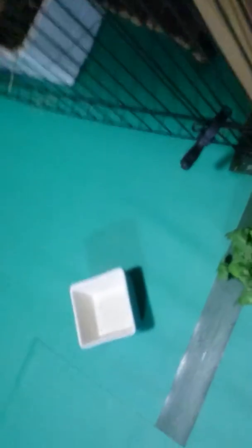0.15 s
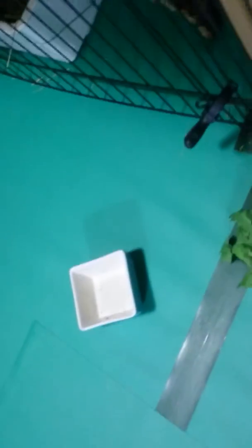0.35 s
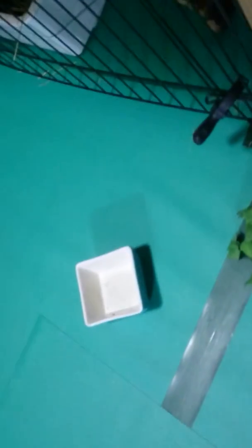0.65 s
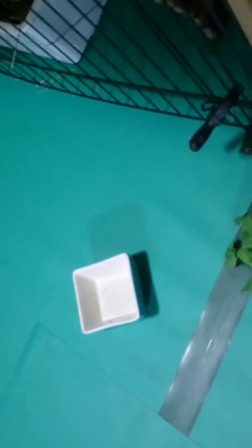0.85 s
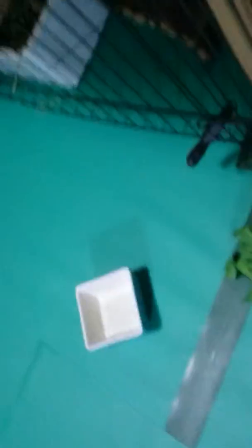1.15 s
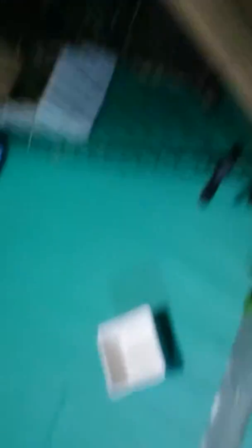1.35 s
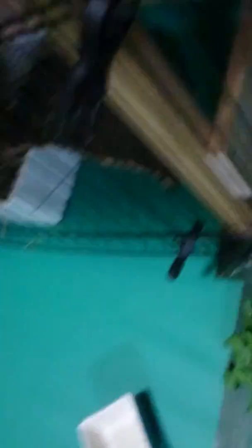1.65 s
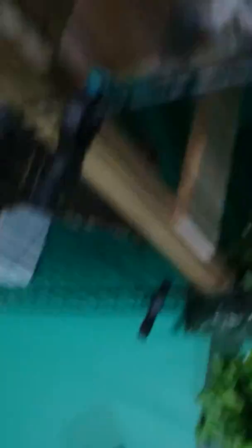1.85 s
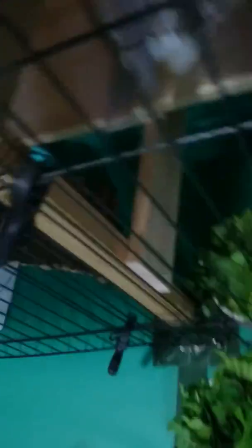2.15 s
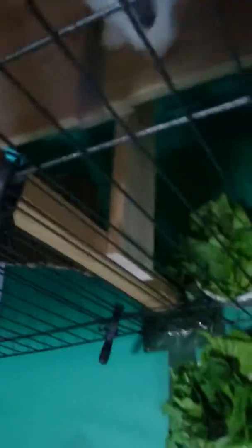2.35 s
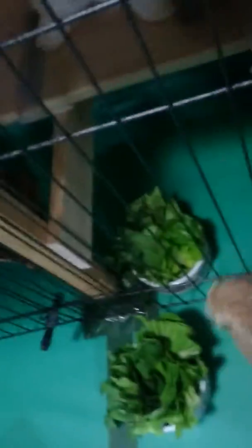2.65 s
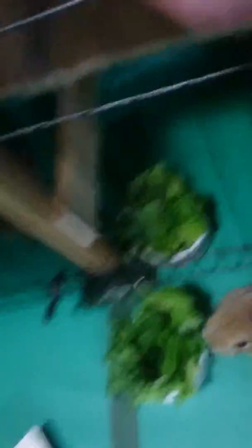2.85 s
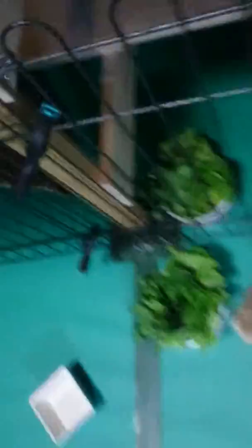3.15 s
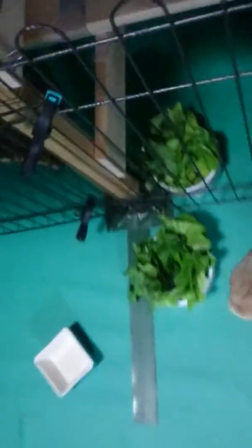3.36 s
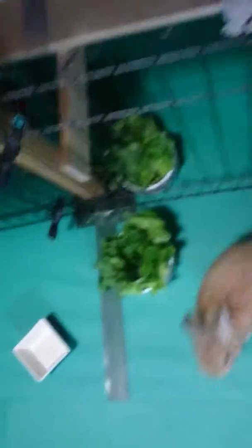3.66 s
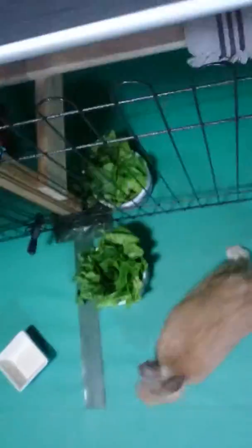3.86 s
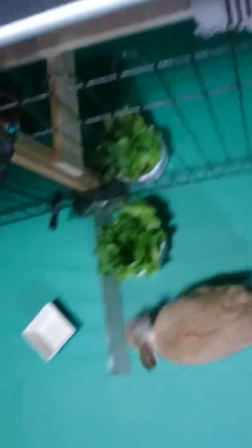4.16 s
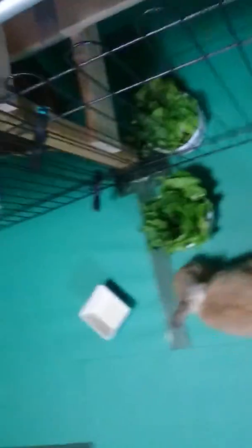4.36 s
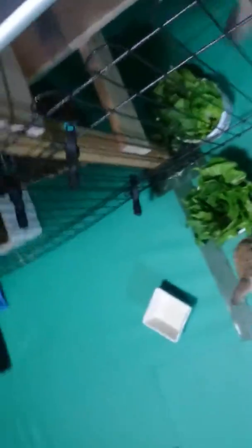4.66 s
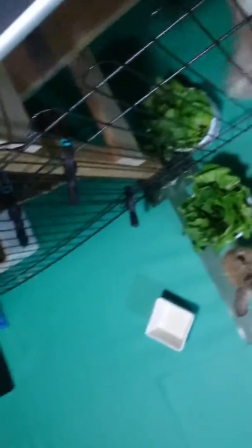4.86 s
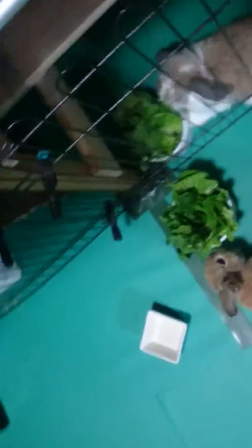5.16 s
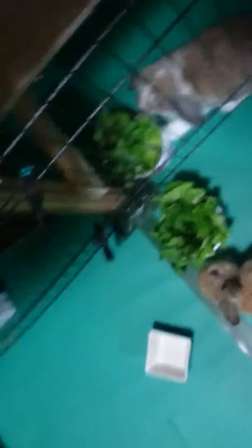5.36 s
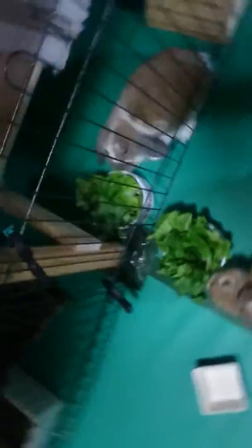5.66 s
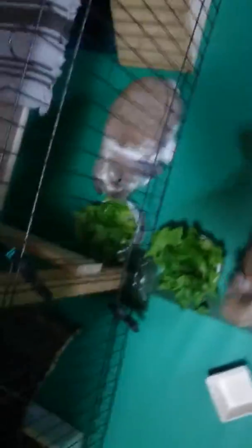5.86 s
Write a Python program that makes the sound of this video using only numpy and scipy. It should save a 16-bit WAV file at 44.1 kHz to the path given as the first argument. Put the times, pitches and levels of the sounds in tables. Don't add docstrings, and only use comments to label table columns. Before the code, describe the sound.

One hollow wooden knock, then sparse crisp ticks, leafy crackles and scuffs on plastic, over a soft steady ventilation hush in a small room.

```python
import sys
import numpy as np
from scipy import signal
from scipy.fft import rfft, irfft, next_fast_len
from scipy.io import wavfile
from scipy.ndimage import uniform_filter1d

SR = 44100
rng = np.random.default_rng(int(sys.argv[2]) if len(sys.argv) > 2 else 0)


def pcm_store(signal):
    levels = np.round(np.clip(np.atleast_2d(signal), -1, 1) * 32767)
    wavfile.write(sys.argv[1], SR, levels.astype(np.int16).T)


def boost(x):
    u = np.asarray(x, float) / 20
    return 10 ** u


N = 264820
TIME = np.arange(N) / SR
KNOCK_S = .6116


def band(x, lo_hz, hi_hz, order=2):
    y = signal.sosfilt(signal.butter(order, [lo_hz, min(hi_hz, SR / 2.1)], "band", fs=SR, output="sos"), x)
    return y / np.sqrt(np.mean(y ** 2))


def walk(rate):
    k = int(SR / rate)
    return uniform_filter1d(np.repeat(rng.standard_normal(N // k + 1), k), k)[:N]


def pan(db):
    return boost(np.array([db / 2, -db / 2]))


def decay(t, t60):
    return boost(-60 * t / max(t60, .004))


def ring(hz, t60, lead, rise=0.00016):
    t = np.arange(int(.3 * SR)) / SR
    shape = (1 - np.exp(-t / rise)) * decay(t, t60)
    return shape * np.sin(2 * np.pi * hz * t + np.array([[lead], [0]]))


def add(out, s, x):
    i = int(s * SR)
    out[:, i:i + x.shape[1]] += x[:, :N - i]


def strokes(s, db, rise_s, hold_s, fade_s, rest_db=-140):
    t = TIME[::32, None]
    before = np.maximum(s - t, 0) / np.maximum(rise_s, 1e-3)
    after = np.maximum(t - s - hold_s, 0) / np.maximum(fade_s, 1e-3)
    power = np.sum(boost(db - 20 * (before + after)) ** 2, axis=1)
    return np.interp(TIME, t[:, 0], np.sqrt(power + boost(rest_db) ** 2))


def grains(slip_db, grit_db):
    return rng.standard_normal((2, N)) * boost(slip_db * walk(120) + grit_db * walk(700))


def hush():
    # (f/Hz, level per Hz/dB)
    hush_colour = [(30, -22), (44, -17.5), (54, -11), (80, -12), (240, -21.5), (439, -7.5), (575, -10.5),
                   (911, -2.5), (2050, -0.5), (2400, -6), (3600, -8.5), (4450, -16), (6300, -13),
                   (10400, -27.5), (16000, -36.5)]
    # (f/Hz, side minus mid/dB)
    hush_side = [(60, 18.5), (110, -6), (200, 17), (380, 8), (700, 6.5), (1290, 0), (2380, 0), (4400, -0.5),
                 (8120, 0.5), (15000, 0)]
    # (t/s, level/dB)
    hush_level = [(0.0, -59), (0.52, -59), (0.67, -55.5), (1.08, -59.5), (1.65, -59), (1.95, -58.5),
                  (2.32, -59), (2.47, -58.5), (2.92, -57.5), (3.42, -61), (3.91, -60), (4.46, -59),
                  (4.81, -59.5), (5.06, -58.5), (5.6, -60.5), (6.0, -57)]
    # (f/Hz, width/Hz, level/dB)
    hum_lines = [(98, 8.7, -74.5), (201, 1.7, -74.5), (302.4, 4.7, -74.5), (405, 23, -92),
                 (512.6, 5.2, -78)]
    # (f/Hz, first level/dB, last level/dB)
    steady_lines = [(199.5, -92, -90), (301.5, -92, -86), (500.6, -98, -80)]
    size = next_fast_len(N)
    log_hz = np.log(np.arange(1, size // 2 + 2) * SR / size)
    hz, db = np.transpose(hush_colour)
    colour = boost(np.interp(log_hz, np.log(hz), db))
    hz, db = np.transpose(hush_side)
    side = boost(np.interp(log_hz, np.log(hz), db))
    noise = rfft(rng.standard_normal((2, size))) * colour * np.array([side ** 0, side])
    inside = (log_hz > np.log(700)) & (log_hz < np.log(2000))
    noise = noise * size / np.sqrt(2 * np.sum(np.abs(noise[0, inside]) ** 2))
    out = 0
    for centre in np.log(20) + np.arange(15) / 2:
        share = np.clip(1 - 2 * np.abs(log_hz - centre), 0, 1)
        drift = 0.4 * walk(2.15)
        flicker = 1.74 * walk(12)
        out = out + irfft(noise * share, size)[:, :N] * boost(drift + flicker)
    mid, wide = out * boost(np.interp(TIME, *np.transpose(hush_level)) - 1.46)
    hum = sum(boost(db) * band(rng.standard_normal(N), hz - w / 2, hz + w / 2, order=1) for hz, w, db in hum_lines)
    for hz, db, last_db in steady_lines:
        swell = boost(3 + db + (last_db - db) * TIME / TIME[-1])
        mid = mid + swell * np.sin(2 * np.pi * hz * TIME)
    return np.array([mid + wide + 1.166 * hum, mid - wide - 0.8 * hum])


def rumble():
    # (t/s, level/dB, rise per 20 dB/s, fade per 20 dB/s)
    grip_shifts = [(.01, -59, 0.5, 0.17), (.3, -71, 5, 3), (.62, -54, 0, -0.1), (.8, -74, 13, 0.5),
                   (1.82, -57, 0.16, 0), (2.46, -72, 2, 0), (2.74, -76, 3, 1), (3.27, -66.5, -1.5, 1.3),
                   (4.63, -70, 0.6, 1.5), (5.65, -65, 0.7, 0.2), (5.93, -74, -1.5, 0.5)]
    push = band(rng.standard_normal(N), 64, 550)
    common = band(rng.standard_normal(N), 64, 550)
    s, db, rise_s, fade_s = np.transpose(grip_shifts)
    effort = boost(4.5) * strokes(s, db, rise_s, 0, fade_s, rest_db=-76.5)
    return effort * np.array([push + 0.27 * common, 0.23 * common - push])


def rustle():
    # (t/s, level/dB, rise per 20 dB/s, hold/s, fade per 20 dB/s)
    sleeve_strokes = [(0, -53, .01, .058, .03), (.092, -52.5, .02, .085, .06), (.258, -54, .03, .05, .15),
                      (.35, -50, .2, .04, .13), (.49, -61, .05, .01, .03), (.57, -55, .012, .1, .2),
                      (.74, -51, .3, .015, .065), (.944, -64, .016, .005, .045), (1.48, -65, .35, .27, .05),
                      (1.798, -55, .04, .005, .08), (2.292, -57, .17, .005, .165),
                      (2.462, -57, .025, .005, .07), (4.148, -65, .007, .005, .1),
                      (4.312, -65, .03, .005, .22), (4.504, -64, .05, .05, .2),
                      (4.636, -57, .3, .005, .055), (4.774, -66.5, .012, .05, .2),
                      (4.974, -57, .3, .005, .04), (5.017, -43, .003, .014, .047),
                      (5.15, -56, .006, .015, .05), (5.203, -45, .03, .078, .045),
                      (5.623, -57.5, .006, .035, .09), (5.77, -58, .06, .015, .045),
                      (5.875, -59.5, .04, .045, .06)]
    cloth = grains(slip_db=2.5, grit_db=1.0)
    air = 0.72 * band(cloth, 4700, 17340) + 0.9 * band(cloth, 15100, 21200)
    return boost(4.0) * strokes(*np.transpose(sleeve_strokes), rest_db=-80.5) * air


def thud():
    out = np.zeros((2, N))
    add(out, KNOCK_S, boost(-53.5) * ring(307, 0.067, lead=0.37, rise=.001))
    return out


def knock():
    # (f/Hz, level/dB, ring to -60 dB/s)
    board_modes = [(586, -22, 0.028), (682, -30, 0.067), (872, -4, 0.024), (913, -25, 0.052),
                   (1130, -17, 0.047), (1303, -14.5, 0.042), (1490, -19, 0.078), (1635, -9.5, 0.043),
                   (1750, -15, 0.067), (1950, -6, 0.062), (1960, -22.5, 0.09), (2300, -21, 0.012)]
    board_side = [3, -1, -7.5, 2, 6, 2, 2, -7, -5, -4.5, -2, 0]
    # (delay/s, level/dB)
    blow_copies = [
        (-.0065, -22),
        (.0145, -21),
        (.0315, -36),
        (.049, -30),
        (.00308, -3.5),
    ]
    knock_db, far_port_lag = -17.5, 45
    out = np.zeros((2, N))
    rise = np.array([[.0008], [.0008]])  # s, left and right
    board = 0
    for (hz, db, t60), side in zip(board_modes, board_side):
        board = board + boost(db) * pan(side)[:, None] * ring(hz, t60, lead=-1.25, rise=rise)
    board = np.array([board[0], np.roll(board[1], far_port_lag)])
    add(out, KNOCK_S, boost(knock_db + 12.5) * board)
    t = TIME[:int(.1 * SR)]
    crack = band(rng.standard_normal((2, len(t))), 2700, 6900) * decay(t, 0.14)
    add(out, KNOCK_S, boost(knock_db - 24.5) * crack)
    rattle = band(rng.standard_normal((2, len(t))), 690, 1600, order=3) * boost(2.5 * walk(123)[:len(t)])
    rattle = rattle * decay(t, 0.37) * (1 - t / t[-1])
    add(out, KNOCK_S + .006, boost(knock_db - 13.5) * rattle)
    for k, (delay_s, db) in enumerate(blow_copies):
        heard = board[::(-1) ** (k // 2)]
        add(out, KNOCK_S + delay_s, boost(knock_db + 4.0 + db) * heard)
    return signal.sosfilt(signal.butter(5, 710, "high", fs=SR, output="sos"), out)


def taps():
    # (t/s, peak/dB, upper f/Hz, lower f/Hz, lower tone level/dB)
    paw_taps = [(0.4262, -43.5, 1860, 1265, 1), (1.4563, -45, 1860, 1310, -14),
                (1.8105, -44.5, 1570, 855, 1.5), (2.2915, -35.5, 1900, 1330, -17),
                (2.4547, -39, 1564, 640, -16), (3.077, -44, 2000, 1500, -8),
                (3.1595, -46.5, 2150, 1285, -8), (5.011, -42.5, 1601, 1204, -9),
                (5.6294, -52, 1760, 692, 8)]
    out = np.zeros((2, N))
    t = TIME[:int(.1 * SR)]
    for s, db, hz, low_hz, low_db in paw_taps:
        t60 = 0.084 * (1000 / low_hz) ** 0.93
        scatter = band(rng.standard_normal((2, len(t))), 0.86 * low_hz, 1.26 * hz) * decay(t, t60)
        add(out, s, boost(db - 5.0) * scatter)
        upper = ring(hz, 0.83 * t60, lead=-0.29)
        lower = boost(low_db) * ring(low_hz, 2.0 * t60, lead=2.64)
        add(out, s, boost(db - 6.5) * (upper + lower))
    return out


def ticks():
    # (t/s, peak/dB, f/Hz, crisp top level/dB, left minus right/dB)
    claw_ticks = [(0.26, -45.5, 5840, -12, 12), (0.5666, -46, 6630, -26, -2),
                  (1.0425, -49, 6100, -30, -1.5), (1.4555, -50.5, 3300, -24, 18),
                  (1.707, -54, 5420, -20, 14), (1.789, -47, 3400, -30, 6), (2.455, -42, 2630, -26, 8),
                  (2.4584, -38, 5740, -25, 11), (3.071, -46, 5100, -37, -12), (3.0815, -42, 3530, -30, 5.5),
                  (4.1499, -45, 6250, -25, 8), (4.2882, -57, 6560, -25, -4), (4.7737, -51.5, 6930, -18, -9),
                  (5.0167, -38, 7020, -16, -1), (5.1522, -42, 7380, -28, -0.5), (5.183, -36, 5990, -17, 3),
                  (5.2406, -36, 6000, -18, -1.0), (5.6225, -55, 8000, -4, -9), (5.6354, -54, 7500, -12, -3),
                  (5.6415, -55, 7860, -1, -9), (2.62, -53, 8300, -20, -5), (5.7711, -52, 6700, -17, -2),
                  (5.866, -56, 5200, -22, 12)]
    out = np.zeros((2, N))
    t = TIME[:int(.1 * SR)]
    t60 = 0.031
    for s, db, hz, top_db, pan_db in claw_ticks:
        snap = rng.standard_normal((2, len(t)))
        crackle = band(snap, .8 * hz, 1.25 * hz) + boost(top_db) * band(snap, 8500, 15500)
        sides = pan(pan_db)[:, None]
        add(out, s, boost(db - 3.0) * sides * crackle * decay(t, t60))
        add(out, s, boost(db - 1.0) * sides * ring(hz, 0.8 * t60, lead=2.35))
    return out


def squeaks():
    # (t/s, level/dB, f/Hz, length/s)
    narrow_noises = [(1.706, -64, 5430, 0.01), (3.333, -53.5, 6100, 0.02), (3.355, -58, 6220, 0.014),
                     (4.299, -51, 6540, 0.03), (4.479, -59, 2204, 0.072), (4.507, -45, 5650, 0.022),
                     (4.577, -57, 6200, 0.092), (5.189, -47.5, 3140, 0.12), (0.616, -59, 406, 0.033),
                     (0.798, -64, 382, 0.048), (5.183, -36, 6160, 0.006)]
    out = np.zeros((2, N))
    for s, db, hz, length_s in narrow_noises:
        hiss = band(rng.standard_normal((2, 4096)), .95 * hz, 1.05 * hz)[:, 1024:]
        add(out, s, boost(db) * hiss * np.exp(-(TIME[:3072] / length_s) ** 4))
    return out


def slips():
    # (t/s, peak/dB, f/Hz, length/s, left minus right/dB)
    brief_tones = [(.088, -52, 7260, .012, -5), (0.27, -53, 6350, 0.0054, 2), (0.32, -50, 6400, .012, 2),
                   (0.34, -50, 6270, .008, 2), (.486, -51, 6540, .006, 0), (1.6086, -53, 3500, 0.0066, 2),
                   (1.7055, -49, 5450, .0035, 8), (1.7493, -51.5, 5620, .005, 2),
                   (1.783, -49, 1600, 0.0036, 0), (1.783, -50, 5850, 0.009, -2),
                   (1.79, -44.5, 3440, .007, 2), (1.796, -52, 4000, 0.01, 8), (1.802, -47, 5300, .004, 0),
                   (1.807, -49, 2760, .005, 2), (1.81, -54, 7050, .012, -2), (1.815, -54, 5800, 0.0087, -2),
                   (1.978, -53, 3100, .008, 5), (2.0635, -55, 6010, 0.0051, -6),
                   (4.2881, -40, 6500, 0.001, -6), (4.2913, -43, 6550, .002, -4),
                   (4.2934, -37, 6650, 0.0021, -3), (4.2972, -39, 6600, .002, -5),
                   (4.3, -48, 1950, .005, -2), (4.309, -46.5, 2025, 0.016, -6),
                   (4.311, -47, 6700, .004, -5), (4.311, -44, 2900, 0.002, 2),
                   (4.3163, -34, 2840, 0.0004, -2), (4.321, -34, 2940, 0.0004, 5),
                   (4.4815, -49, 2185, 0.021, -5), (4.504, -43, 2205, 0.024, -5),
                   (4.536, -49, 2310, .005, 2), (5.157, -51, 6000, 0.0086, -5), (5.2, -41, 5800, .005, 0),
                   (5.213, -36, 5200, .004, 0), (5.222, -36.5, 3200, 0.0057, 4),
                   (5.238, -37, 6040, .004, -3), (5.25, -40, 3400, 0.0031, 2), (5.275, -42, 6800, .003, -1),
                   (1.0425, -36.5, 6440, 0.00053, 5), (2.291, -39, 1890, 0.0038, 3),
                   (2.455, -34, 2700, 0.00067, 4), (3.064, -44, 3100, 0.003, 4),
                   (3.0701, -32, 3000, 0.00085, 2), (3.0785, -45, 2910, 0.0023, 4),
                   (3.082, -47, 4300, .002, 2), (3.16, -53, 2100, .008, 0), (5.018, -41, 6000, 0.0018, -1),
                   (5.023, -40, 6760, 0.0064, -5), (5.0255, -38, 9230, .003, -1),
                   (5.033, -43, 6800, .003, -1), (5.185, -33, 6030, .0015, -2),
                   (5.6224, -42, 8300, .0006, -5), (5.6354, -42, 7500, .0006, -3),
                   (5.6413, -45, 8500, .0006, -3), (5.783, -48, 8000, .001, 0), (5.869, -48, 6000, .001, 2),
                   (5.925, -54, 1787, 0.026, -2), (5.956, -51, 1796, 0.009, 0),
                   (.627, -29, 830, 0.0057, -2), (0.647, -43, 1940, 0.011, -1),
                   (.659, -37.5, 1960, 0.019, -5), (.666, -39.5, 930, 0.0068, 0),
                   (0.69, -44, 1050, .005, 0), (0.615, -50, 524, 0.02, 7), (2.731, -67, 410, 0.081, 0),
                   (3.24, -67.5, 390, .12, 4), (3.27, -66.5, 528, 0.046, 0), (3.73, -68.5, 481, .08, 2),
                   (3.94, -67.5, 421, 0.06, 2), (4.582, -71, 409, 0.061, 0), (5.6, -68, 431, 0.068, 4),
                   (.624, -33, 1196, 0.011, -2), (.634, -40, 1473, 0.016, -2), (.65, -42, 1306, 0.021, -2),
                   (5.6221, -47, 13500, .0008, -5), (3.071, -36, 5140, 0.0012, 4),
                   (2.458, -53, 645, 0.028, 2), (4.4815, -43, 2210, 0.003, -2),
                   (2.4547, -45, 1860, .003, 3), (2.459, -53, 990, .025, 4), (2.461, -50, 1160, .01, 2),
                   (2.457, -51, 1400, .014, 2), (2.46, -65, 468, .02, 2), (4.516, -46.5, 2420, .022, -3),
                   (4.491, -45, 6300, .004, -3), (4.4795, -48, 6400, .005, -3),
                   (3.0835, -43, 3400, .002, 3), (1.7095, -49, 5450, .004, 8), (1.787, -49, 7000, .004, -2),
                   (1.822, -52, 6900, .005, -2), (1.822, -52, 6300, .005, -2), (1.826, -51, 2500, .004, 2),
                   (1.6, -51, 1550, .008, 0), (1.81, -52, 3700, .004, 5), (2.296, -50, 3700, .002, 3),
                   (2.3005, -49, 3750, .003, 3), (2.295, -51, 7050, .003, 0), (2.2995, -53, 6800, .002, 0),
                   (5.1827, -27, 6300, .0016, -2), (5.208, -36, 6000, .003, 0),
                   (5.219, -35, 5300, 0.0029, 1), (4.3005, -44, 6600, .0012, -4),
                   (5.2268, -33, 3500, .0004, -2), (5.2543, -34, 3500, .0004, 2),
                   (5.2153, -34, 4500, .0004, 0), (5.2695, -38, 6800, .001, 0),
                   (4.525, -39, 3000, .0004, -3), (5.017, -39, 2200, .0004, -1), (5.82, -56, 1970, .01, 0),
                   (5.865, -55, 2250, .008, 0)]
    out = np.zeros((2, N))
    t = TIME[:8192]
    for s, db, hz, length_s, pan_db in brief_tones:
        chance = rng.standard_normal(len(t))
        wobble = uniform_filter1d(chance, size=64) * 8
        flutter = uniform_filter1d(chance[::-1], size=256) * 16
        db = db + 4 * min(length_s / .02, 1) * flutter
        phase = 2 * np.pi * hz * np.cumsum(1 + .015 * wobble) / SR + np.array([[.6], [0]])
        age = t / max(length_s, .0004)
        shape = (1 - np.exp(-age / 0.17)) * np.exp(-age ** 3)
        add(out, s, boost(db) * pan(pan_db)[:, None] * shape * np.sin(phase))
    return out


def rubs():
    # (t/s, level/dB, fade per 20 dB/s, squeak f/Hz)
    bite_strokes = [(.258, -53.5, 0.4, 6300), (.316, -50.5, 0.28, 6180), (1.04, -69, 12, 6075),
                    (1.454, -57.5, -0.5, 5700), (1.706, -57.5, 0.35, 5460), (1.785, -48.5, 0.13, 6000),
                    (2.461, -56.5, 0.2, 5990), (2.622, -61, -0.07, 6300), (3.064, -51, 0.05, 5270),
                    (3.338, -63, -0.5, 6100), (4.147, -51.5, 0.04, 6380), (4.292, -49.5, 0.17, 6560),
                    (4.484, -50.5, 0.14, 6000), (4.774, -63, 0.1, 6590), (5.021, -49.5, 0.07, 6890),
                    (5.1856, -40, -0.03, 6106), (5.21, -39, 0, 5375), (5.275, -46, 0.04, 6750),
                    (5.62, -75, 0.5, 6720), (5.77, -57.5, 0.1, 6620), (5.866, -57.5, 0.1, 6000)]
    # (t/s, level/dB, rise per 20 dB/s, hold/s, fade per 20 dB/s)
    paw_shuffles = [(0, -54.5, .01, .01, 0.5), (0.603, -60, 0.2, 0.009, 0.14),
                    (0.66, -53.5, -1.5, 0.082, 0.1), (1.195, -68.5, 2.5, .01, 6),
                    (1.606, -64, 0.6, .01, 0.5), (2.29, -58, 0.1, 0.0091, 0.2),
                    (4.511, -47, 0.045, 0.0097, 0.1), (4.588, -55, 0.1, 0.042, 0.1),
                    (4.946, -60, 0.5, .01, 0.25), (5.096, -62, -0.1, 0.034, 0.3),
                    (5.197, -36.5, -0.03, 0.015, 0.07), (5.235, -40, 0.01, 0.029, 0.0352)]
    # (t/s, level/dB, rise per 20 dB/s, fade per 20 dB/s, upper resonance/dB)
    mat_scuffs = [(.256, -65, .04, 0.76, 0.5), (.436, -59, -0.2, -0.2, -11), (1.792, -55, 0.03, 0.2, -2),
                  (3.074, -55, .025, .04, 0), (4.315, -55, .04, .1, -5), (4.483, -56, .006, .12, -13),
                  (4.51, -50, .05, .05, -4), (4.524, -49, .03, .035, -5), (5.2, -53, 0.02, 0.06, -6),
                  (5.225, -51, 0.05, 0.04, 0), (5.262, -48, 0.06, 0.07, -2)]
    # (t/s, left minus right/dB)
    rabbit_side = [(0.0, 4), (.8, 2), (2.51, 1.5), (2.75, -3), (3.07, 6.5), (3.34, -7), (4.01, -14.5),
                   (4.14, -3.5), (6.0, 0)]
    rub = grains(slip_db=2.4, grit_db=-2.5)
    s, db, fade_s, hz = np.transpose(bite_strokes)
    biting = strokes(s, db, 0.0077, 0.0091, fade_s)
    shuffling = strokes(*np.transpose(paw_shuffles), rest_db=-75)
    effort = np.hypot(biting, shuffling)
    tone = np.cos(2 * np.pi * np.cumsum(np.interp(TIME, s, hz)) / SR)
    squeak = band(grains(slip_db=1.7, grit_db=0.5), 37, 940) * tone
    port = 0.95 * squeak + 0.62 * band(rub, 4700, 8630, order=3)
    low = 0.8 * band(rub, 1990, 2420) + 0.56 * band(rub, 1840, 2610, order=3)
    high = 0.71 * band(rub, 2860, 3520) + 1.17 * band(rub, 2560, 4060, order=3)
    s, db, rise_s, fade_s, share_db = np.transpose(mat_scuffs)
    mat = strokes(s, db, rise_s, 0, fade_s) * low
    mat = mat + strokes(s, db + share_db + 2.5, rise_s, 0, fade_s) * high
    return pan(np.interp(TIME, *np.transpose(rabbit_side))) * (boost(0.5) * effort * port + mat)


def room(x):
    t = TIME[:int(.4 * SR)]
    tail = rng.standard_normal((2, len(t))) * decay(t, 0.16) * (t > .014)
    tail = tail / np.sqrt(np.sum(tail ** 2, axis=1, keepdims=True))
    return boost(-10.5) * signal.fftconvolve(x, tail, axes=1)[:, :N]


def scene():
    hits = ticks() + taps() + thud()
    blow = knock()
    near = hits + blow + room(hits + boost(-9) * blow)
    return hush() + rumble() + rustle() + near + squeaks() + slips() + rubs()


def top_cut(x):
    return signal.sosfilt(signal.butter(12, 15850, fs=SR, output="sos"), x)


def record(dry):
    dipped = dry - 0.3 * signal.lfilter(*signal.iirpeak(4450, 5.5, fs=SR), dry)
    cut = signal.sosfilt(signal.ellip(10, .2, 70, 15800, fs=SR, output="sos"), dipped)
    offset = cut - .0003
    return top_cut(offset)


dry = scene()
out = record(dry)
pcm_store(out)
```